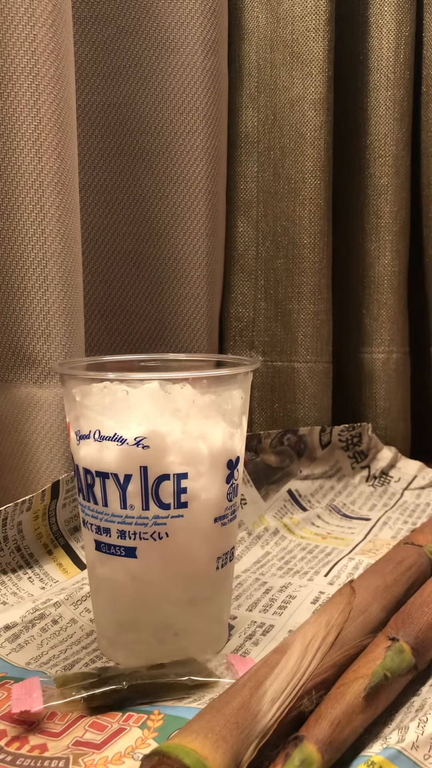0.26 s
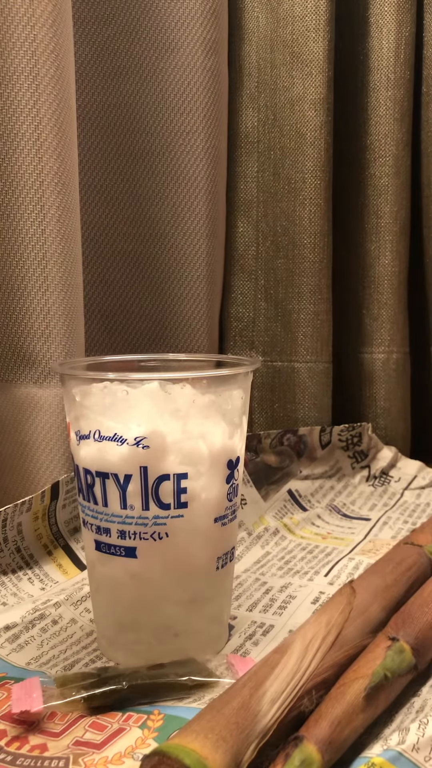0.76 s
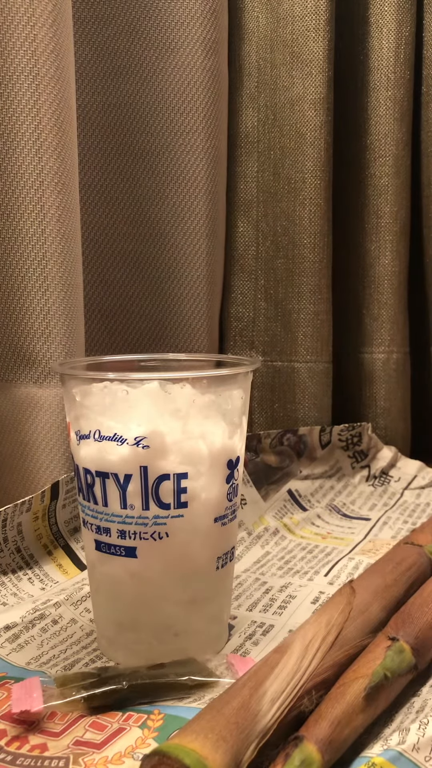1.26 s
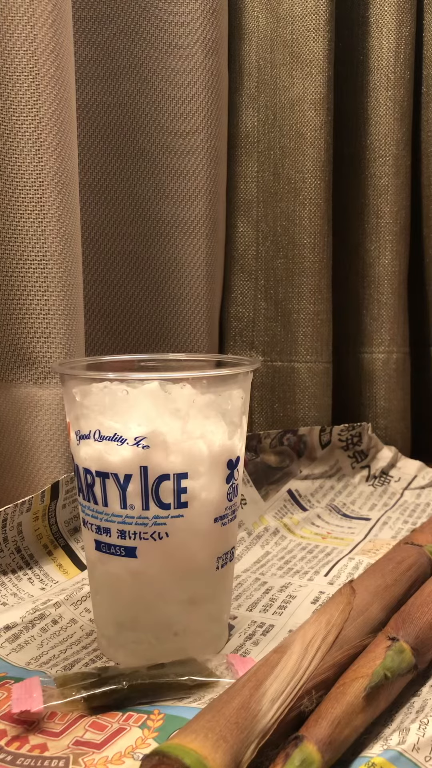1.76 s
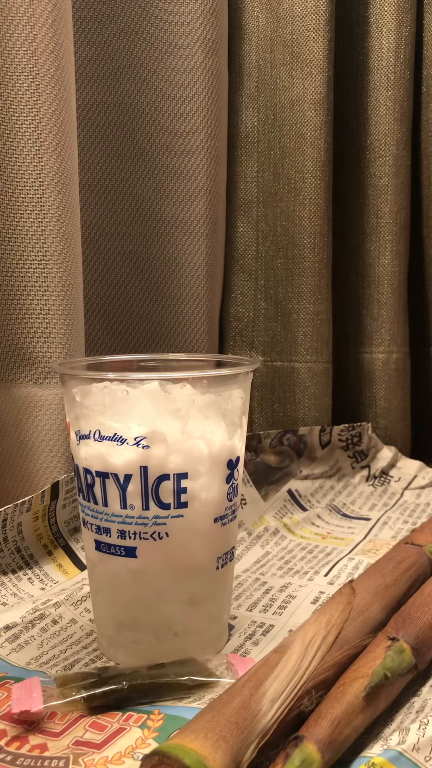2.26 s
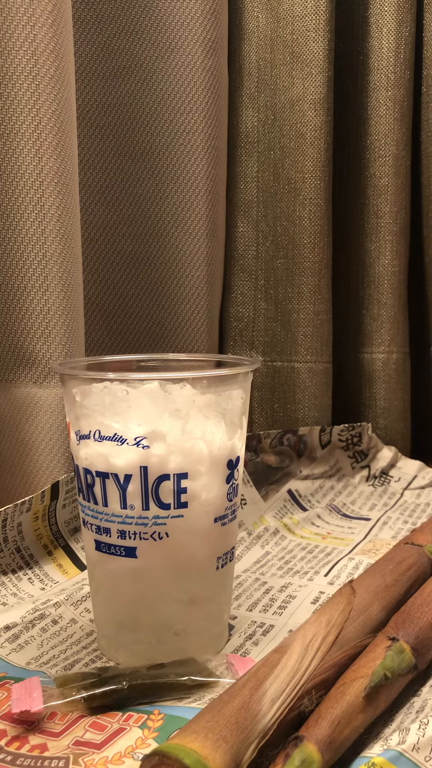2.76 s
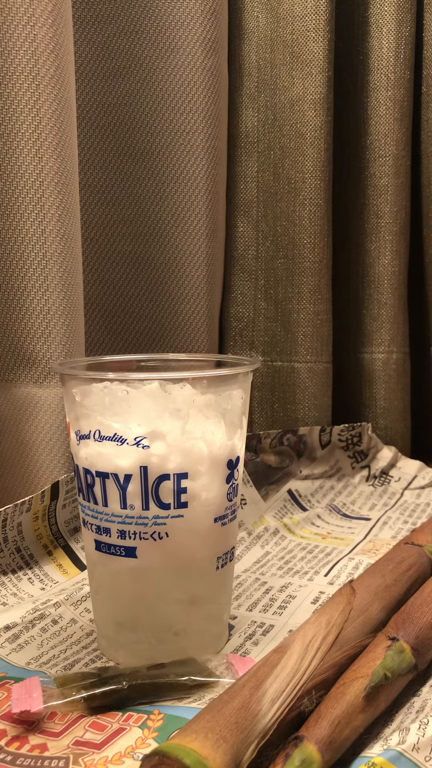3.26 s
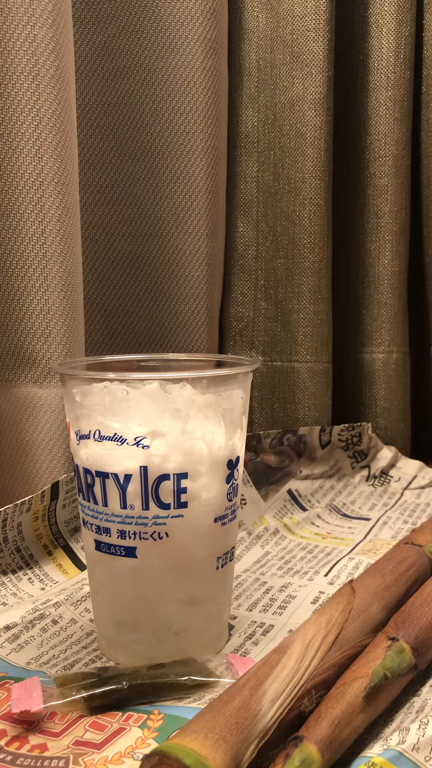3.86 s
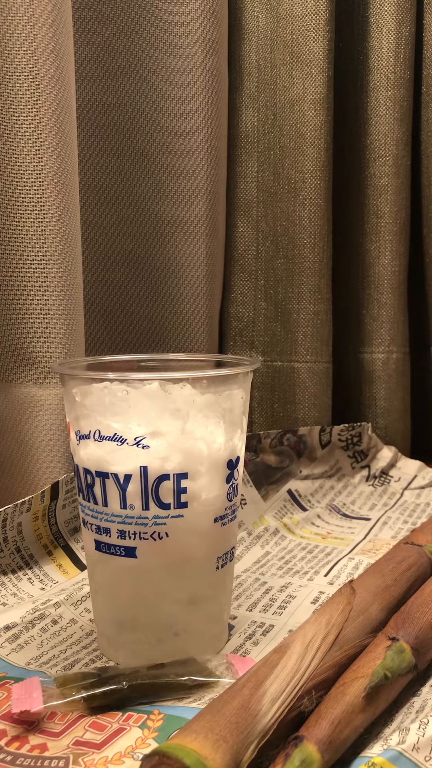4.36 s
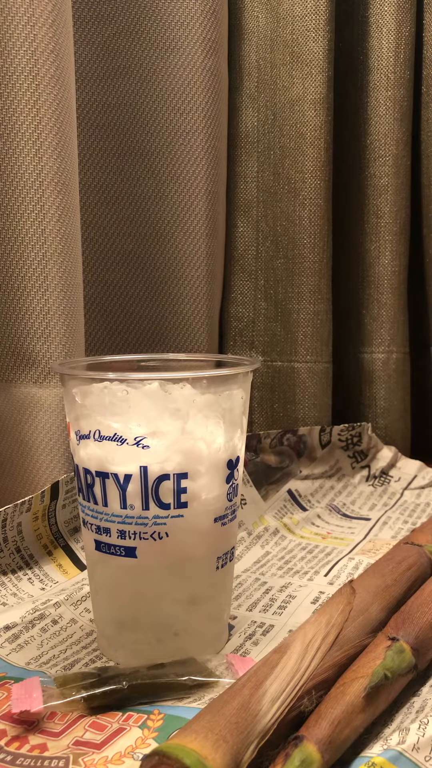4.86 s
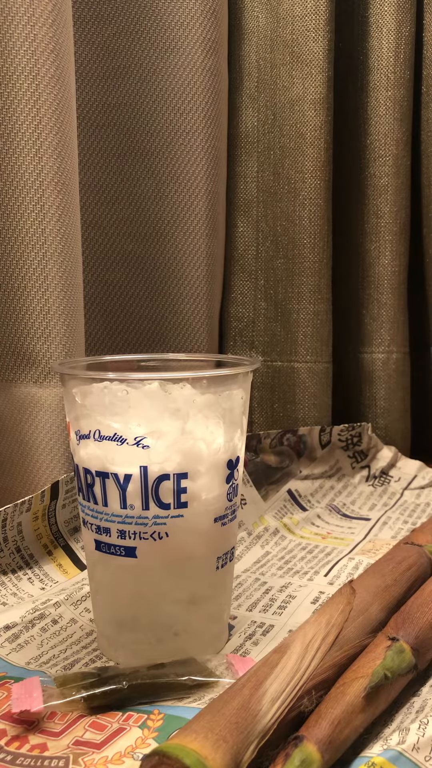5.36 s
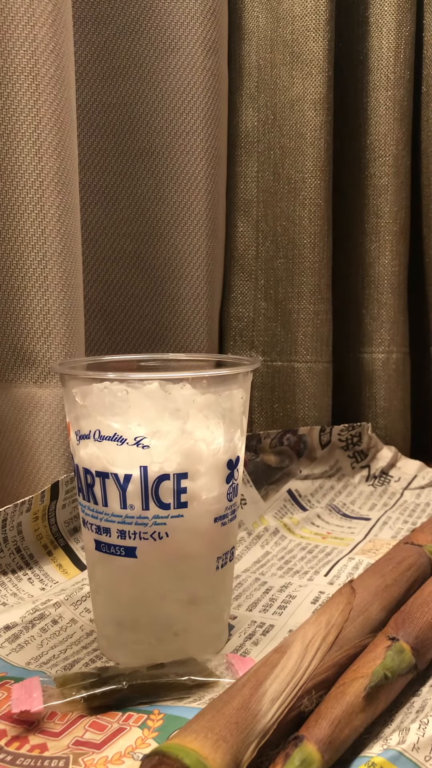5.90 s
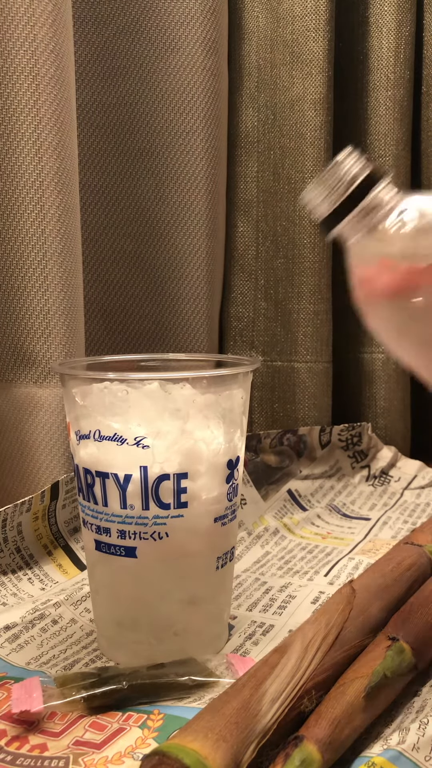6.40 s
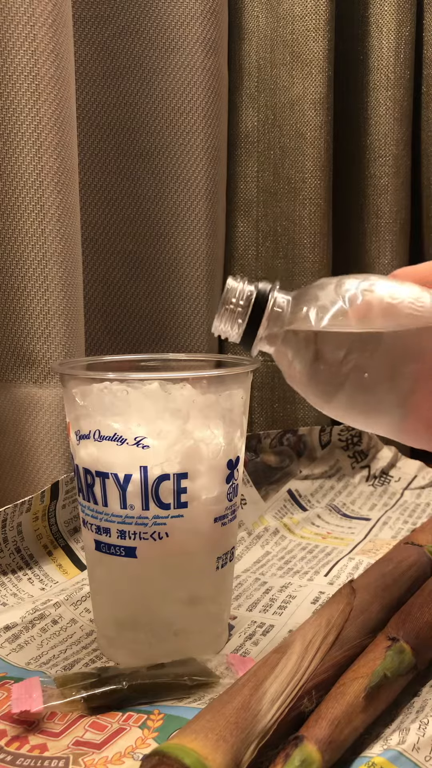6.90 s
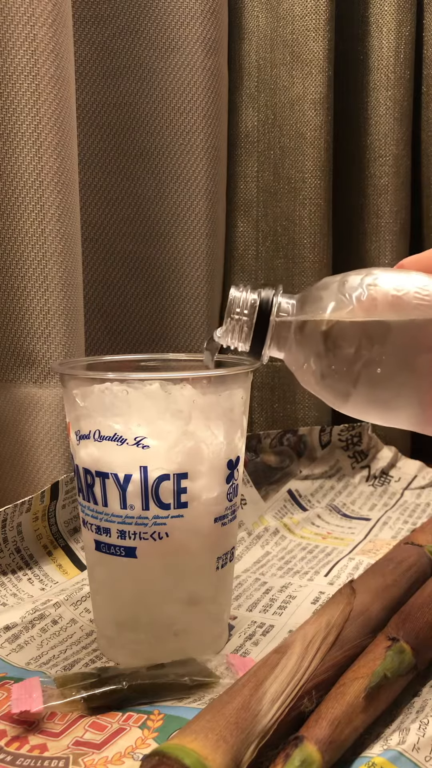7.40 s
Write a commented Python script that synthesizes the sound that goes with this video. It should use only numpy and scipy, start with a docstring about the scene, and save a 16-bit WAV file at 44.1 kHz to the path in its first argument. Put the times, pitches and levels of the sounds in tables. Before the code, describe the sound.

Close up in a small furnished room with a faint low hum, soft thumps come first. A plastic bottle cap's seal cracks sharply amid small puffs of gas; after another leak, a pop and short loud hiss burst out. The cap scrapes and clicks up its thread, then drops, bounces and rattles on the table. A sleeve brushes and light taps tick as the bottle is tipped.

```python
"""Opening a bottle of soda

A plastic bottle is opened beside a cup of ice in a small, humming room. The seal cracks in sharp blows that ring
the plastic; gas, made from coloured noise, leaks in puffs, then bursts out with a pop. The cap scrapes up its
thread and rattles to rest on the table. Low notes with dull thuds sound under the table, bottle, pop and cap,
and light taps tick as the bottle is tipped."""
import sys
import numpy as np
from scipy import signal
from scipy.fft import rfft, irfft
from scipy.io import wavfile
from scipy.ndimage import uniform_filter1d

SR = 44100
rng = np.random.default_rng(int(sys.argv[2]) if len(sys.argv) > 2 else 0)


def pcm_store(signal):
    """Save signal as 16-bit PCM."""
    levels = np.round(np.clip(np.atleast_2d(signal), -1, 1) * 32767)
    wavfile.write(sys.argv[1], SR, levels.astype(np.int16).T)


N = 336924
TIME = np.arange(N) / SR  # seconds

# ringing notes of the bottle, for its snaps and its pop: [f/Hz, width/Hz, level/dB]
BOTTLE_MODES = [(299.3, 140, -4.5), (520, 130, 0.5), (980, 140, -2), (1385, 240, 0), (1830, 270, -0.5),
                (2530, 270, 2), (3725, 870, -2), (5200, 2600, -7), (8160, 3000, -12), (13020, 4400, -19.5)]


def undb(db):
    """Turn decibels into a gain."""
    return 10 ** (np.asarray(db) / 20)


def unit(x):
    """Scale to an rms (average strength) of 1."""
    return x / np.sqrt(np.mean(x ** 2))


def curves(rows):
    """Join the values of each table column by straight lines in time."""
    s, *columns = np.transpose(rows)
    return [np.interp(TIME, s, column) for column in columns]


def fade(t, t60):
    """Die away exponentially, by 60 dB in t60 seconds."""
    return np.exp(-np.log(1000) * t / t60)


def swell(middle_s, half_s):
    """Rise and fall smoothly around one moment."""
    return np.exp(-((TIME - middle_s) / half_s) ** 2)


def add(track, s, sound):
    """Mix a sound into the track at time s."""
    i = int(s * SR)
    track[i:i + len(sound)] += sound[:N - i]


def noise(colour):
    """Make noise of rms 1 whose spectrum follows a table of frequencies and levels."""
    hz, db = np.transpose(colour)
    f = np.fft.rfftfreq(N, 1 / SR) + 1
    gain = undb(np.interp(np.log(f), np.log(hz), db))
    return unit(irfft(rfft(rng.standard_normal(N)) * gain, N))


def walk(rate):
    """Wander smoothly at random with a spread of 1, taking rate new values a second."""
    k = max(int(SR / rate), 1)
    steps = np.repeat(rng.standard_normal(N // k + 1), k)
    return unit(uniform_filter1d(steps, k)[:N])


def lowpass(x, hz, order=2):
    """Soften everything above hz."""
    return signal.sosfilt(signal.butter(order, min(hz, SR / 2 - 1), fs=SR, output="sos"), x)


def highpass(x, hz, order=2):
    """Weaken everything below hz."""
    return signal.sosfilt(signal.butter(order, hz, "high", fs=SR, output="sos"), x)


def resonance(f, hz, width):
    """Give the response of one damped ringing note, with gain 1 at its centre."""
    return 1 / (1 + 1j * (f * f - hz * hz) / (f * width))


def strike(events, modes, spike, favour, edge, crunch_s, halving_db, size=8192):
    """Ring an object's notes with blows, each a sharp spike and a short crunch of tiny slips.
    The crunch lasts crunch_s at -40 dB and halves with every halving_db of extra force."""
    t, f = np.arange(size) / SR, np.fft.rfftfreq(size, 1 / SR) + 1
    body = sum((-1) ** k * undb(db) * resonance(f, hz, width) for k, (hz, width, db) in enumerate(modes))
    track = np.zeros(N)
    for s, db, tilt_db, spot_hz in events:
        length = crunch_s * 2 ** (-(db + 40) / halving_db)
        push = rng.standard_normal(size) * fade(t, length)
        push /= np.linalg.norm(push)
        push[0] += spike
        hardness = undb(tilt_db * np.log2(np.hypot(f, 700)))  # a higher tilt gives a harder, brighter blow
        spot = 1 + favour * resonance(f, spot_hz, .5 * spot_hz)  # the place that is hit favours some notes
        blow = irfft(rfft(push) * body * hardness * spot)[:size // 2]
        blow = lowpass(blow, edge * spot_hz)  # notes far above those are hardly reached
        strength = np.sqrt(np.sum(blow ** 2) / (SR / 200))  # all its energy, as if spread over 5 ms
        add(track, s, blow * undb(db) / strength)
    return track


def patter(run, scatter_db, count, spread_octaves=1.12):
    """List the blows of a run of faint touches, uneven in time, strength and place."""
    start_s, end_s, first_db, last_db, tilt_db, spot_hz = run
    chance = rng.random((count, 3))
    progress = (np.arange(count) + chance[:, 0]) / count
    touches = []
    for p, (_, force, place) in zip(progress, chance):
        s = start_s + p * (end_s - start_s)
        db = first_db + p * (last_db - first_db) + scatter_db * (force - .5)
        touches.append((s, db, tilt_db, spot_hz * 2 ** (spread_octaves * (place - .5))))
    return touches


def background(air_db=-57, waver_db=3.0, drift_rad=1.0):
    """Moving air is low-heavy noise; an appliance hums in sines of wavering strength and timing."""
    # colour of the moving air: [f/Hz, level/dB]
    air_colour = [(18, -38), (30, -4), (55, -2), (90, -7.5), (124, -4), (204, -12.5), (328, -13.5),
                  (437, -16), (512, -16.5), (760, -24), (822, -23), (1160, -28), (3400, -28.5),
                  (12000, -40), (16000, -45)]
    # notes of the appliance hum: [f/Hz, level/dB]
    hum_notes = [(48, -68.5), (119.6, -60.5), (335, -73), (400, -80.5), (530, -76.5), (800, -78.5)]
    # air and hum grow louder and brighter near half a second: [t/s, level/dB, extra treble/dB]
    air_level = [(0, -3, -14.5), (.47, -4.5, -11), (.488, 0.5, 2), (2.6, 0, 2), (7.64, 0, -0.1)]
    level_db, treble_db = curves(air_level)
    both = noise(air_colour) * undb(air_db)
    for hz, db in hum_notes:
        strength = np.sqrt(2) * undb(db + waver_db * walk(9))
        both = both + strength * np.sin(2 * np.pi * hz * TIME + drift_rad * walk(9.8))
    low = lowpass(both, 500, order=1)
    return undb(level_db) * (low + undb(treble_db) * (both - low))


def rubbing(grain_db=4, grip_db=3, holding_db=-79):
    """Fingers and thread stick and slip in fine grains that vary with the grip; cloth brushes more softly."""
    # strokes of the fingers and the thread on the plastic: [middle t/s, level/dB, half length/s]
    strokes = [(2.28, -63.5, .05), (2.947, -66.5, 0.031), (4.306, -64.5, 0.046), (4.65, -56.5, .07),
               (4.9, -64, 0.055), (7.13, -69.5, 0.09), (7.38, -66.5, 0.036)]
    # colour of the rubbing: [f/Hz, level/dB]
    rub_colour = [(150, -20.5), (350, 0), (750, -9.5), (1100, 4), (2500, -11), (4000, -8), (8000, -19),
                  (16000, -30.5)]
    # colour of the cloth: [f/Hz, level/dB]
    cloth_colour = [(800, -11), (2000, -3.5), (3500, 0), (5500, -8.5), (9000, -25.5)]
    effort = undb(holding_db) + sum(undb(db) * swell(s, half_s) for s, db, half_s in strokes)
    fingers = effort * unit(noise(rub_colour) * undb(grain_db * walk(600) + grip_db * walk(45)))
    # a sleeve brushes once as the arm moves over
    sleeve = undb(-67.5 + 2 * walk(24.95)) * swell(6.4, 0.34) * noise(cloth_colour)
    return fingers + sleeve


def low_notes(rise_s=0.0026, thud_db=-13, thud_hz=330, thud_t60=.12):
    """The table, bottle, pop and dropped cap each swell briefly into one low note over a dull thud."""
    # low notes and dull thuds of the table, the bottle, the pop and the dropped cap:
    # [t/s, level/dB, f/Hz, t60/s]
    notes = [(.12, -52, 301, 0.16), (.417, -45, 87.4, 0.32), (.523, -33, 132, 0.12),
             (.615, -35.5, 137, 0.24), (2.847, -42.5, 550, 0.083), (3.938, -38.5, 185, 0.095),
             (4.93, -40.5, 332, 0.11), (5.482, -42.5, 346, 0.23), (5.814, -33, 554, 0.07),
             (5.866, -43, 589, 0.21), (6.973, -52.5, 205, 0.66), (7.211, -45.5, 205, 0.205),
             (7.222, -34, 91.4, 0.11)]
    track, t = np.zeros(N), np.arange(SR // 2) / SR
    for s, db, hz, t60 in notes:
        note = np.sin(2 * np.pi * hz * t) * fade(t, t60)
        dull = unit(lowpass(rng.standard_normal(len(t)), thud_hz, order=4))
        thud = undb(thud_db) * dull * fade(t, thud_t60)
        add(track, s, undb(db) * (note + thud) * (1 - np.exp(-t / rise_s)))
    return track


def gas(sputter_db=1.0, flutter_db=2.0, sizzle_hz=15400, sizzle_rate=2400, lowest_hz=380):
    """Gas rushing through the wet thread is turbulent noise: small leaks, a thin sizzle, then the full rush."""
    # each twist of the cap leaks a puff: [start t/s, hiss level/dB, attack/s, t60/s, sizzle above hiss/dB]
    leaks = [(1.0, -61, .02, .09, -25), (1.43, -65, .075, 0.99, -25), (1.648, -50.5, .052, 0.28, -25),
             (1.84, -48.5, .045, .13, -25), (3.35, -52.3, 0.0757, .9, -13), (3.54, -62, .1, 0.24, -4.5),
             (3.765, -59.5, 0.055, 0.23, -2)]
    # colour of the jet: [f/Hz, level/dB]
    jet_colour = [(150, -29.5), (500, -24.5), (800, -29.5), (1600, -20.5), (2500, -11), (3500, -6.5),
                  (5500, 1), (7800, -1), (10000, -1), (14000, 1.5), (16000, -0.5)]
    leak, sizzle = 0, 0
    for s, db, attack_s, t60, sizzle_db in leaks:
        attack = np.clip((TIME - s) / attack_s, 0, 1)
        puff = undb(db) * attack * fade(np.maximum(TIME - s - attack_s, 0), t60)
        leak = leak + puff
        sizzle = sizzle + undb(sizzle_db) * puff
    flow = leak * undb(flutter_db * walk(68)) + rush()
    jet = noise(jet_colour) * flow * undb(sputter_db * walk(1500))
    jet = highpass(jet, lowest_hz)  # a narrow gap sends out little bass
    whistle = unit(walk(sizzle_rate) * np.sin(2 * np.pi * sizzle_hz * TIME))  # a narrow band of noise
    return jet + sizzle * whistle


def taps():
    """Light taps on the handled bottle ring its thin wall."""
    # light taps: [t/s, level/dB, tilt/(dB per octave), favoured f/Hz]
    tap_blows = [(1.17, -52, -2, 1400), (6.97, -41.5, 1, 1330), (6.982, -52, -2, 1250),
                 (7.003, -56, -4, 2000), (7.087, -53.5, -5, 1330), (7.208, -50.5, -3.5, 646),
                 (7.26, -58.5, -1, 3500)]
    # ringing notes of the bottle's wall under the fingers: [f/Hz, width/Hz, level/dB]
    wall = [(520, 140, -3), (726, 75, -2.5), (1010, 84, 0.5), (1340, 95, 3), (1972, 210, -2.5),
            (2630, 130, 0.5), (3490, 270, -0.5), (5080, 1200, -9.5), (9990, 4000, -23.5)]
    return strike(tap_blows, wall, spike=0.77, favour=2.0, edge=11, crunch_s=.021, halving_db=13)


def seal_cracks():
    """The tearing seal of the cap snaps and rings in short, bright blows."""
    # cracks of the seal: [t/s, level/dB, tilt/(dB per octave), favoured f/Hz]
    cracks = [(1.6902, -40, -2, 4500), (1.6975, -36.5, -0.8, 2800), (1.8817, -25.5, 2, 6200),
              (1.8848, -23.5, 0.8, 4800)]
    # ringing notes of the seal: [f/Hz, width/Hz, level/dB]
    seal = [(508, 56, 0), (970, 130, 0), (1470, 210, 0), (1850, 370, -1.5), (2980, 2000, -7.5),
            (4150, 480, 3.5), (5640, 1500, -1), (7140, 1650, 2), (9300, 2900, -0.5), (11600, 1900, 5),
            (15100, 2800, 1.5)]
    return strike(cracks, seal, spike=0.35, favour=0.94, edge=2.43, crunch_s=0.014, halving_db=60)


def bottle_snaps():
    """The turning cap snaps and slips along its thread and rings the bottle."""
    # snaps of the turning cap: [t/s, level/dB, tilt/(dB per octave), favoured f/Hz]
    snaps = [(3.128, -58, 1.5, 3500), (3.3445, -49, 7, 2800), (3.351, -38.5, 4.5, 2830),
             (3.3535, -50, 3.5, 5200), (3.889, -29.5, 1.8, 8030), (4.316, -51, -1.5, 2480),
             (4.322, -46.5, -1, 2520), (4.477, -52, -0.5, 3800), (4.519, -45, 0.5, 2470),
             (4.551, -45.5, -3, 994), (4.639, -44, -2, 2300), (4.7395, -48, 6.5, 3600),
             (4.7435, -36.5, -1.3, 1100), (4.763, -51.5, 8, 1300)]
    # one run of thread slips: [start t/s, end t/s, first level/dB, last level/dB,
    # tilt/(dB per octave), favoured f/Hz]
    thread_slips = (4.57, 4.7, -52.5, -47.5, -2.6, 2100)
    slips = patter(thread_slips, scatter_db=11, count=9)
    return strike(snaps + slips, BOTTLE_MODES, spike=0.7, favour=1.1, edge=9, crunch_s=.019, halving_db=20)


def rush(start_s=3.928, attack_s=.06, hold_s=0.044, t60=0.057, db=-17, trail_db=-26, trail_t60=0.29):
    """The pressure escapes in one flow that swells, holds and shuts, and a little gas trails after it."""
    t = TIME - start_s
    attack = np.clip(t / attack_s, 0, 1)
    shut = np.maximum(t - attack_s - hold_s, 0)
    return undb(db) * attack * (fade(shut, t60) + undb(trail_db) * fade(shut, trail_t60))


def pop():
    """The seal lets go in one blow that rings the bottle."""
    # the pop, one row: [t/s, level/dB, tilt/(dB per octave), favoured f/Hz]
    pop_blow = (3.937, -22.7, 1.5, 1350)
    return strike([pop_blow], BOTTLE_MODES, spike=0.64, favour=0.98, edge=3.4, crunch_s=.015, halving_db=22)


def dropped_cap():
    """The loose cap lands, bounces and wobbles on the table, ringing its own notes."""
    # landing and bounces: [t/s, level/dB, tilt/(dB per octave), favoured f/Hz]
    bounces = [(5.369, -29, 1, 2700), (5.4745, -33.5, -0.9, 11000), (5.48, -26, 2.5, 4960),
               (5.529, -28.5, 1, 4900), (5.5405, -33, 0, 9100), (5.559, -38.5, -4, 4800),
               (5.604, -36.5, -1.5, 7000), (5.642, -39, -3, 7500), (5.6565, -38.5, 2, 4830),
               (5.684, -41.5, -2.5, 7000), (5.812, -49, -0.5, 9000), (5.857, -53, 0, 9000)]
    # one run of wobbling touches: [start t/s, end t/s, first level/dB, last level/dB,
    # tilt/(dB per octave), favoured f/Hz]
    cap_wobble = (5.5, 5.725, -46, -45.5, -0.7, 7000)
    # ringing notes of the cap: [f/Hz, width/Hz, level/dB]
    cap = [(148, 47, -1.5), (344, 47, 5), (584, 110, 5.5), (962, 85, 5), (1310, 390, 2), (2000, 400, -0.5),
           (2600, 340, 0.5), (3580, 870, -4), (4640, 1050, -4), (7210, 400, -4), (9450, 2700, -12.5),
           (12300, 2400, -11.5), (15000, 2200, -14.5)]
    wobble = patter(cap_wobble, scatter_db=11, count=26)
    return strike(bounces + wobble, cap, spike=0.63, favour=1.0, edge=1.66, crunch_s=0.023, halving_db=6)


def room(x, early_db=-8, early_t60=0.039, late_db=-7, low_t60=0.4, high_t60=0.26,
         split_hz=6000, high_db=-2, build_s=0.0075):
    """Add quick reflections from the table top, then the short tail of a furnished room."""
    t = np.arange(SR * 3 // 5) / SR
    early = rng.standard_normal(len(t)) * fade(t, early_t60) * (t > .0015)
    scatter = rng.standard_normal(len(t))
    low = lowpass(scatter, split_hz, order=1)
    late = low * fade(t, low_t60) + undb(high_db) * (scatter - low) * fade(t, high_t60)
    late *= 1 - np.exp(-(t / build_s) ** 2)  # the tail builds up gradually
    echoes = undb(early_db) * early / np.linalg.norm(early) + undb(late_db) * late / np.linalg.norm(late)
    return x + signal.fftconvolve(x, echoes)[:N]


def scene():
    """Mix everything in one small room; the jet points at the microphone, so it is drier."""
    hiss = gas()
    plastic = taps() + seal_cracks() + bottle_snaps() + pop() + dropped_cap()
    echoing = room(plastic + rubbing() + 0.84 * hiss)
    return (echoing + 0.39 * hiss + low_notes() + background())[None]


def record(dry, hiss_db=-82, bass_hz=38, top_hz=16000):
    """The microphone adds a faint hiss and cuts the deep bass and the top."""
    hiss = undb(hiss_db) * rng.standard_normal(N)
    thin = highpass(dry + hiss, bass_hz, order=6)
    return signal.sosfilt(signal.ellip(10, .2, 70, top_hz, fs=SR, output="sos"), thin)


dry = scene()
out = record(dry)
pcm_store(out)
```